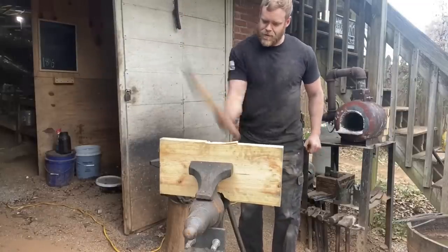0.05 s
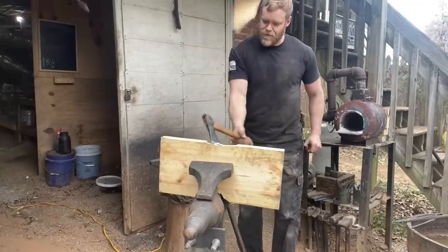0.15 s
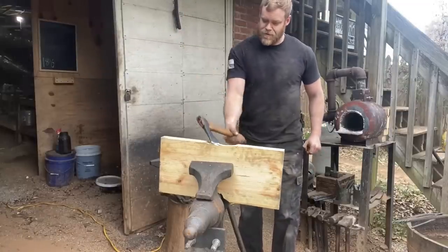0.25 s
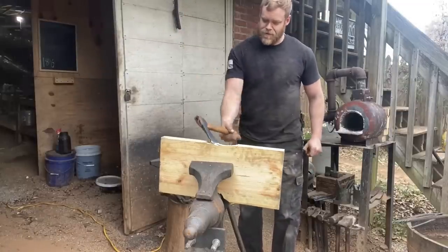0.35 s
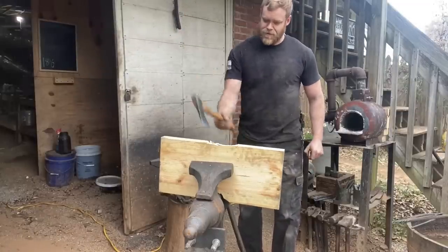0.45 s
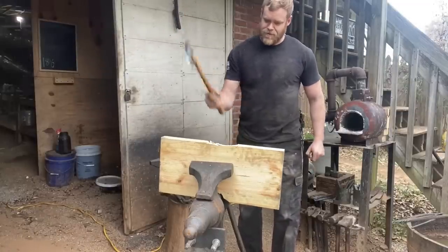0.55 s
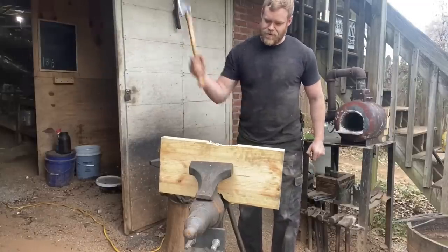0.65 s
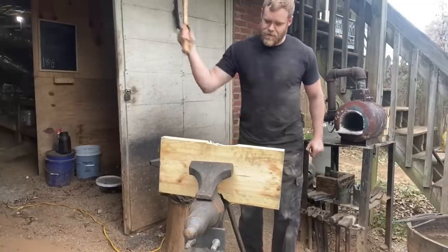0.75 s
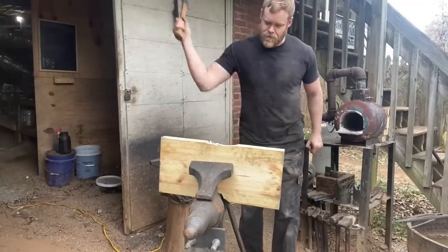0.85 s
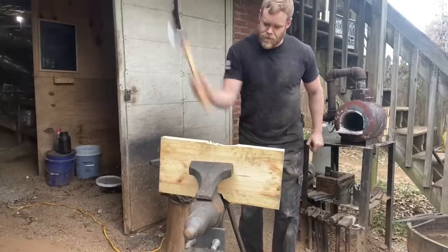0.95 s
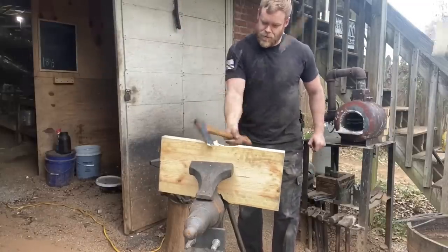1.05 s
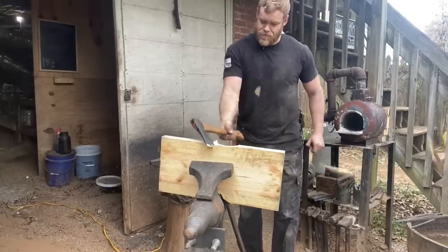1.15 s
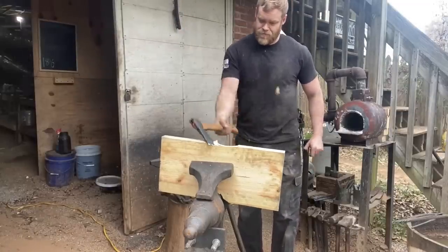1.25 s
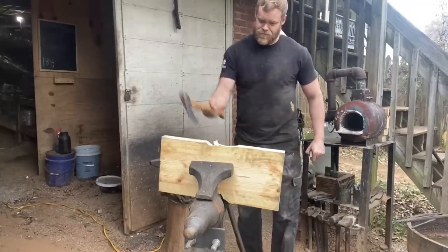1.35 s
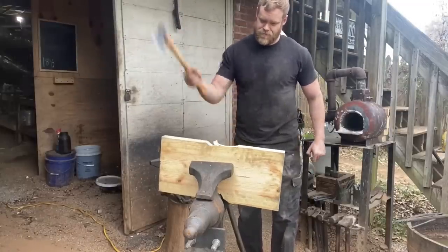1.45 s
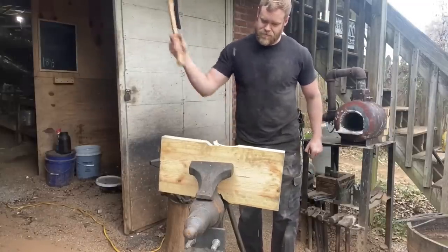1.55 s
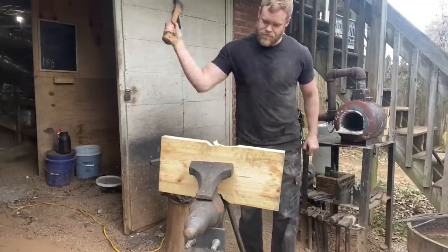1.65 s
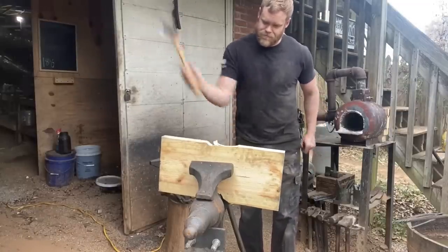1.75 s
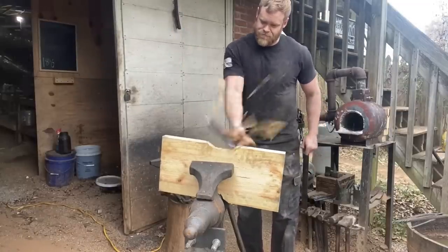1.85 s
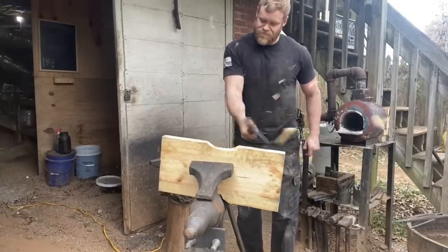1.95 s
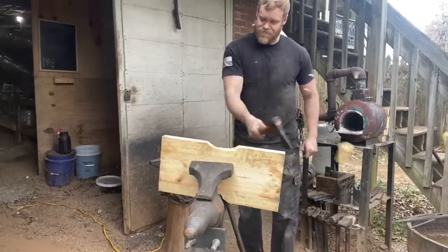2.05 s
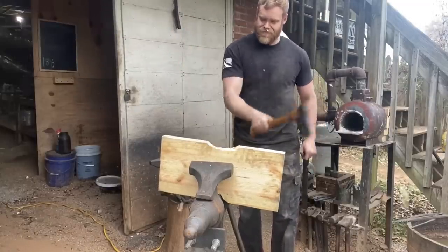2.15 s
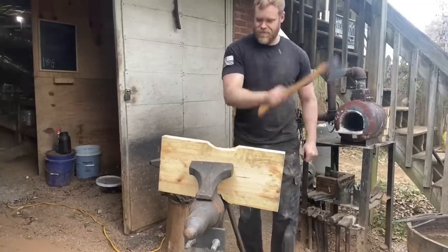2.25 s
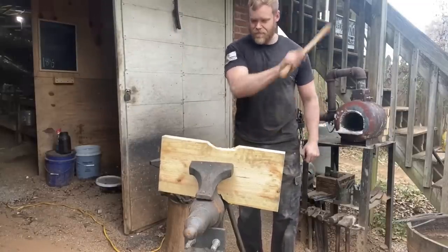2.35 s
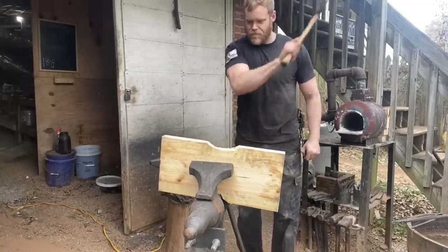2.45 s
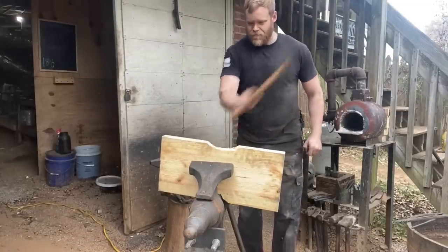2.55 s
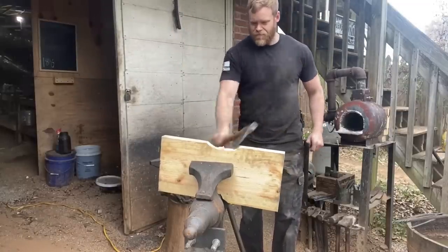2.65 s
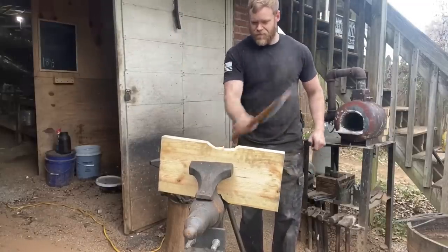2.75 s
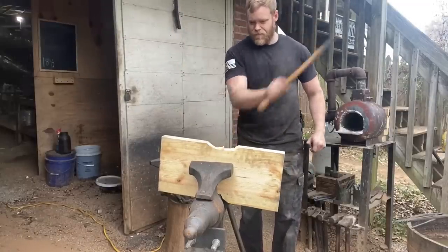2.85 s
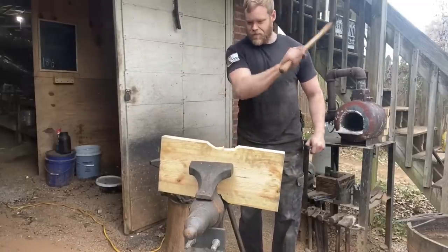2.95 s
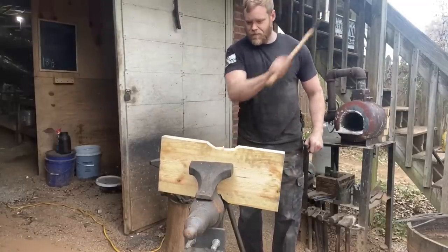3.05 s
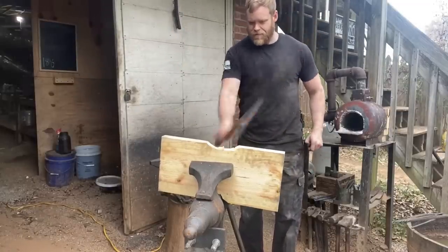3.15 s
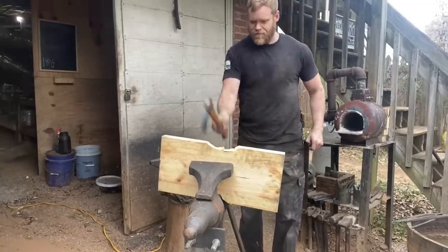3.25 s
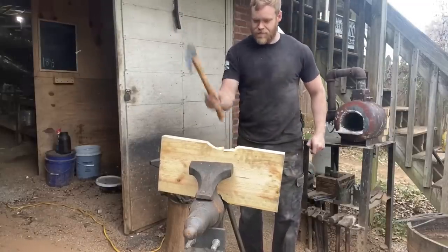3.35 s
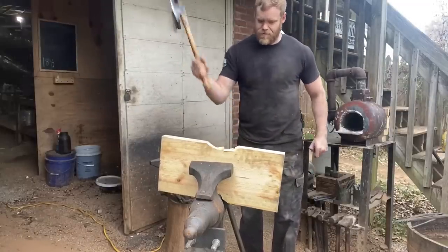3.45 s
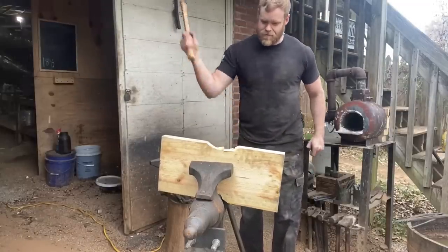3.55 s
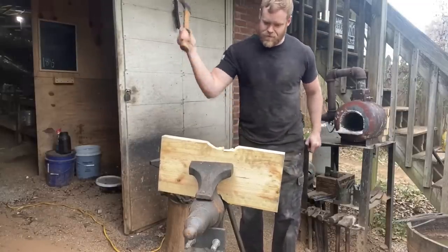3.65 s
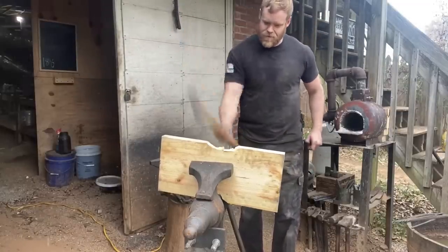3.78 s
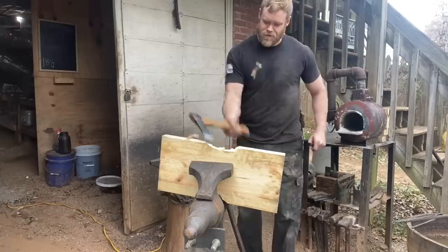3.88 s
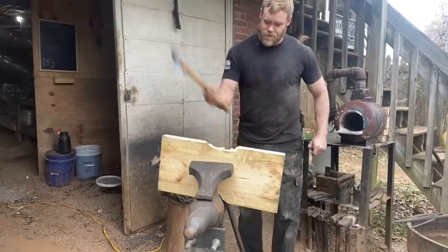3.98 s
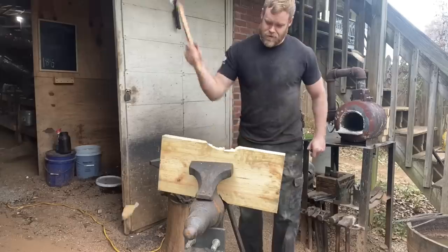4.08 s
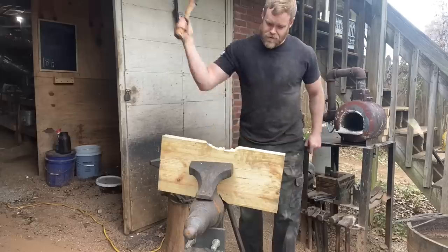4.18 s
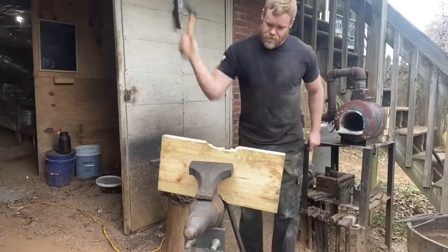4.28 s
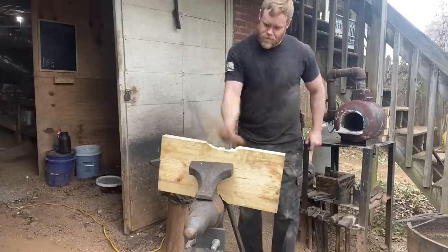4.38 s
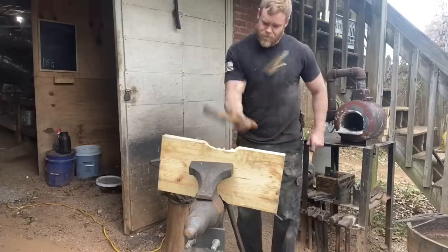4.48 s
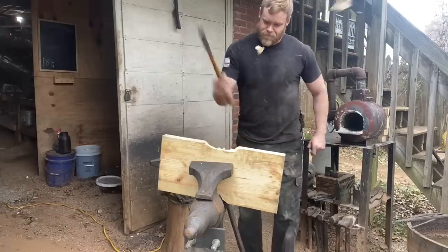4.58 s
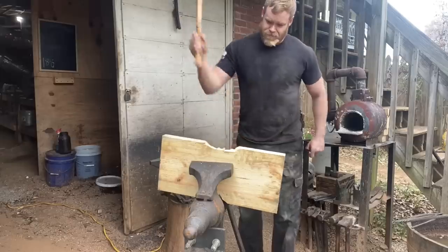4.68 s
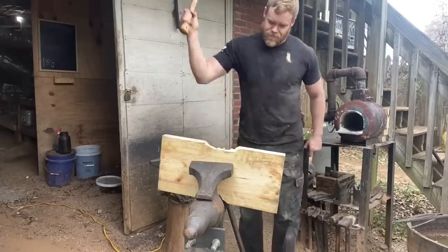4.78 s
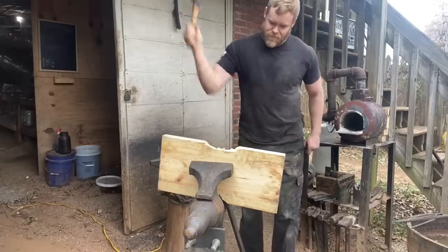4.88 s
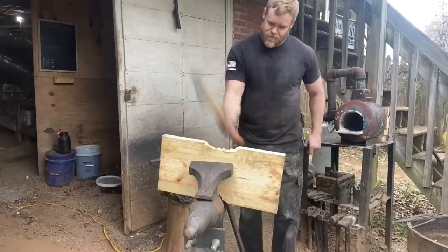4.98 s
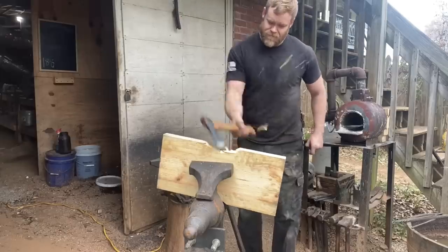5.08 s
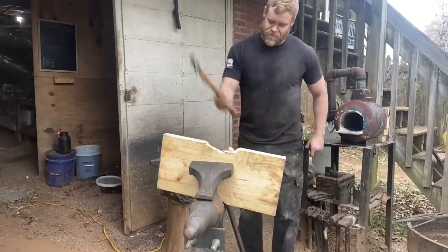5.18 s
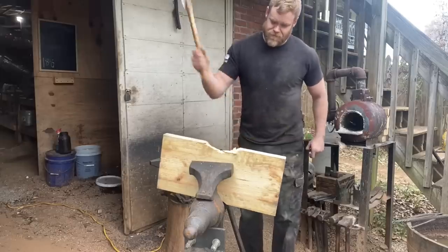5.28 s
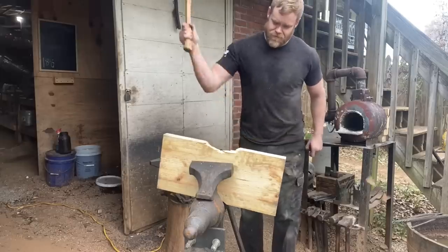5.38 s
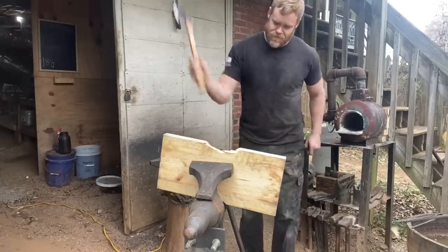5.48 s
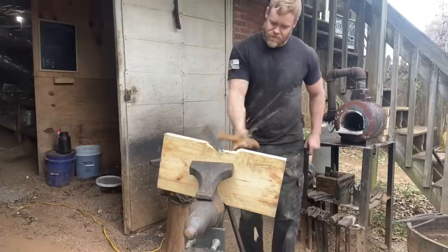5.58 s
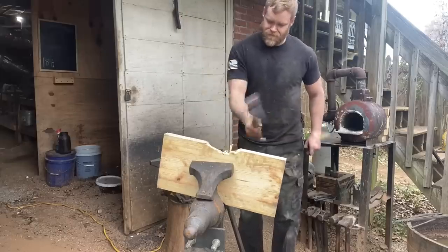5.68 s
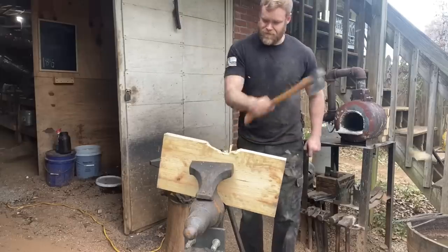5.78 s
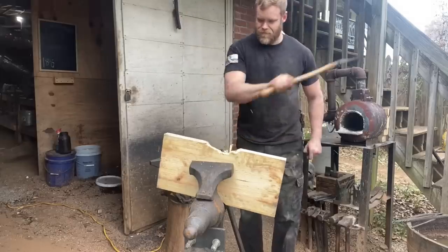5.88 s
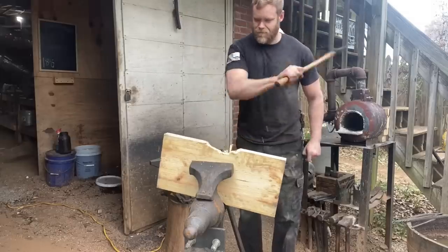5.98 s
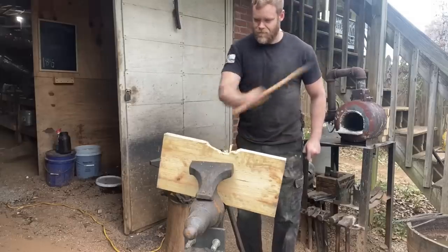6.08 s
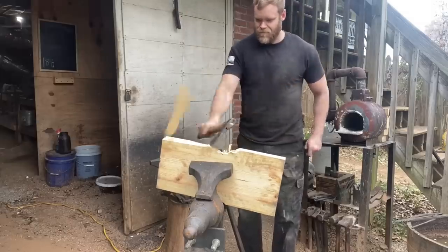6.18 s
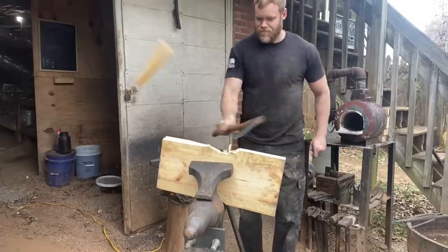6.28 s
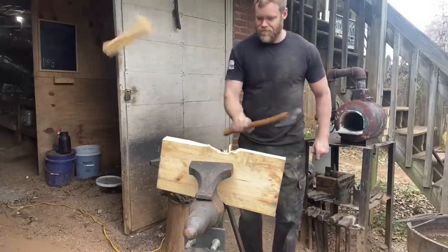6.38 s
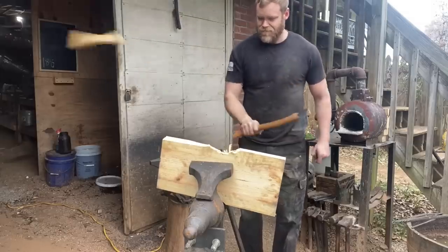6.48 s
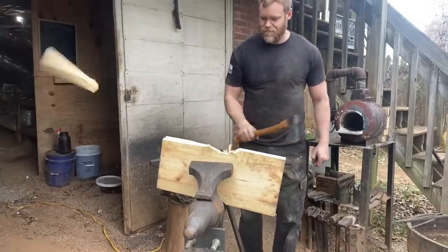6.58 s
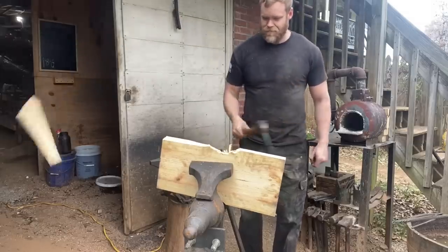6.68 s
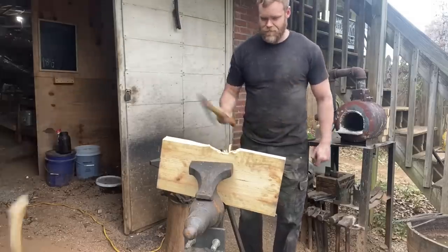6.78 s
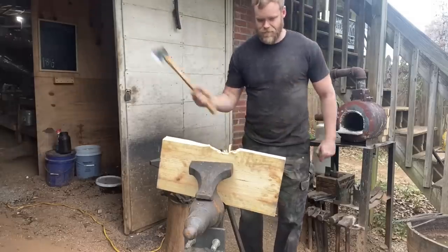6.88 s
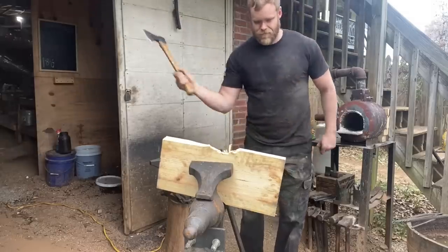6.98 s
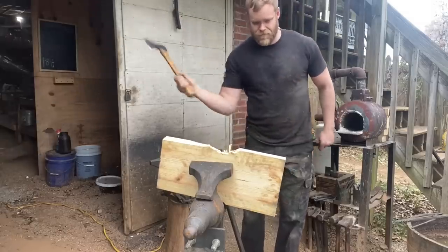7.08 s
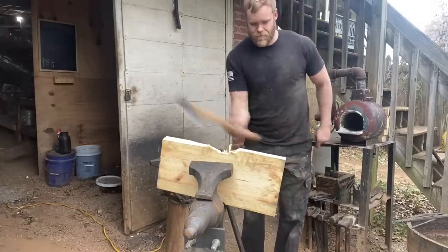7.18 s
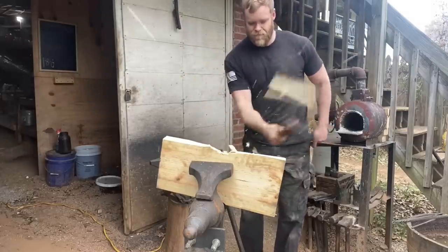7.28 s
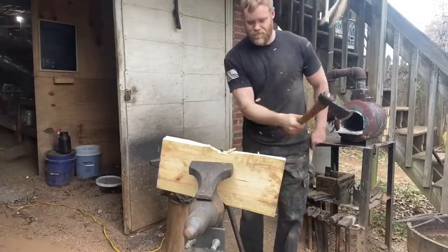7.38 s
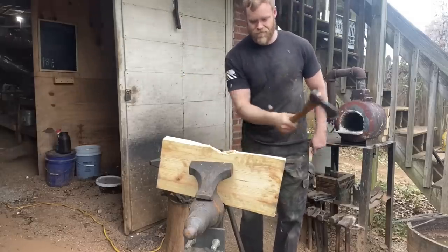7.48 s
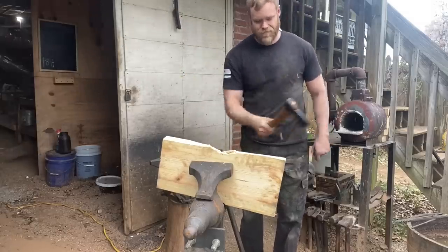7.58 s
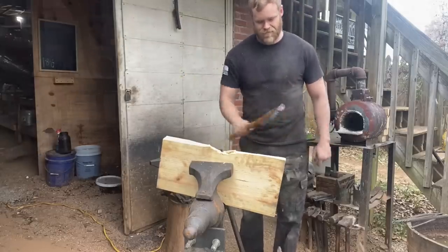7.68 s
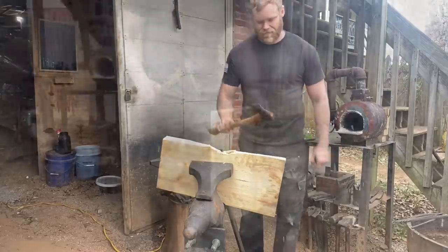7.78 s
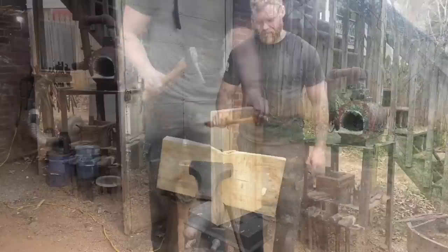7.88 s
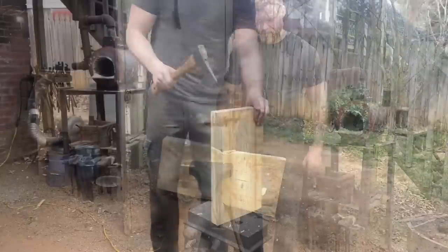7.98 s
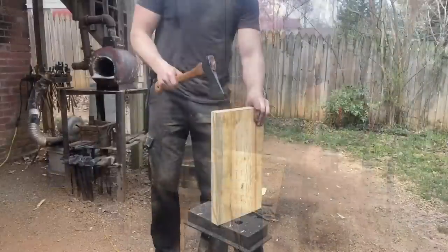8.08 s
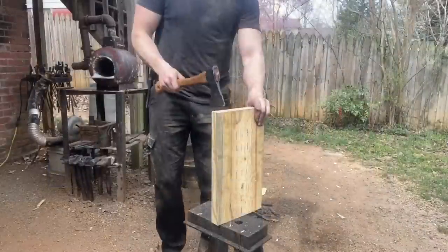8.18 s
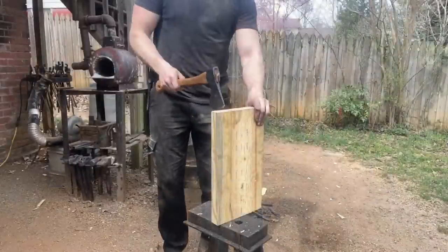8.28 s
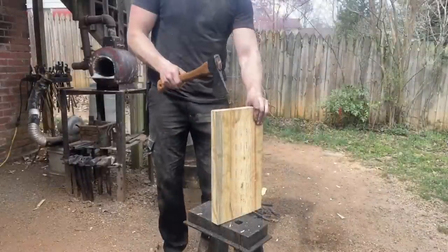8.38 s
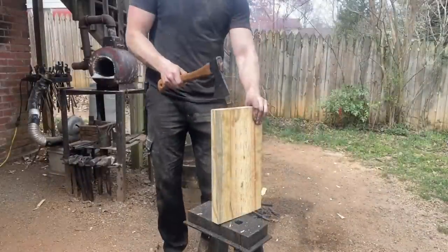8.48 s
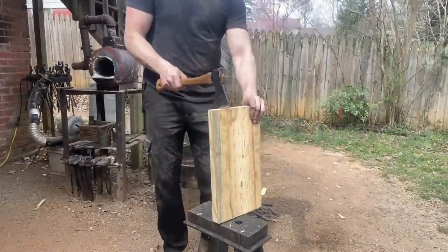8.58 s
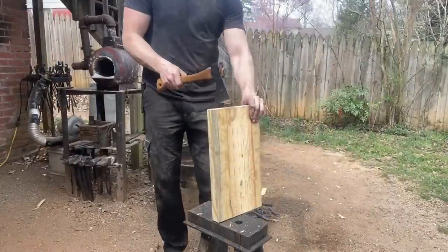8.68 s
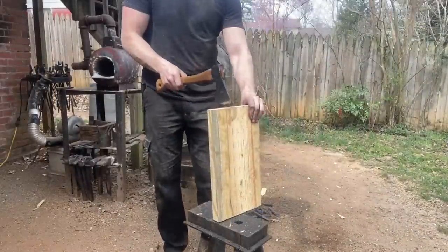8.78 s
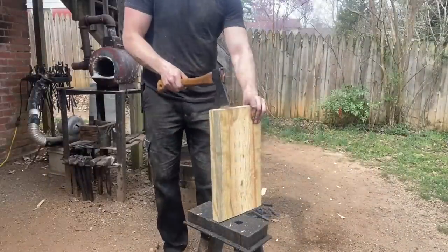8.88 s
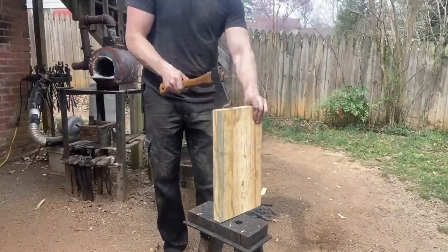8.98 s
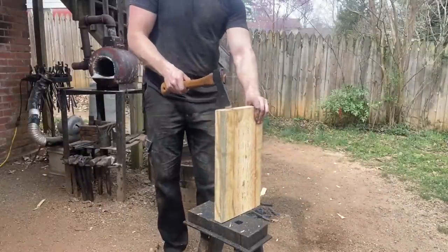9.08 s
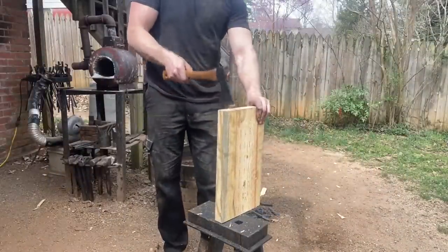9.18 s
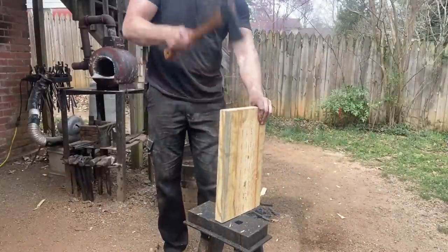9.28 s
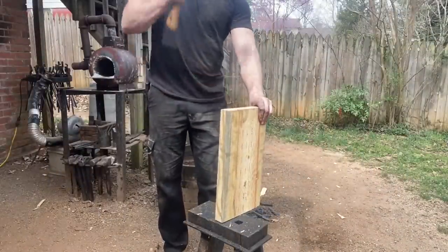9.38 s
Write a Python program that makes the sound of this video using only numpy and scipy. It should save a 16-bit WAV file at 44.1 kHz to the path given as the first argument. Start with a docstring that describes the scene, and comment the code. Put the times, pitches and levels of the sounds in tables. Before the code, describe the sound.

Eleven strong, dry axe chops on a board held in a vice, each with a short reflection off nearby walls and a faint yard tail. Small chips land as ticks, loose wood scrapes, and a wind gust thumps the microphone midway. After the last chop and a clatter, steady open-air noise rises with whistling small birds, soft scuffs and two light touches of the axe on upright wood.

```python
"""Outside a workshop, in still air and a swelling breeze (shaped noise), an axe chops eleven times into the
edge of a clamped pine board: noise for torn fibres, a sagging knock, and dying tones for wood and steel.
Chips land as short ticks; loose wood scrapes, knocks and at last clatters down; one gust thumps midway.
Then an open yard fades in as noise, with small birds made of whistled glides and a far chorus of noise.
There the axe is set lightly on an upright board, twice: a click and short woody tones."""
import sys
import numpy as np
from scipy import signal
from scipy.fft import rfft, irfft
from scipy.io import wavfile
from scipy.ndimage import uniform_filter1d, minimum_filter1d

SR = 44100
rng = np.random.default_rng(int(sys.argv[2]) if len(sys.argv) > 2 else 0)


def dump(signal):
    """Clip the signal to [-1, 1] and save it as 16-bit WAV at the path in sys.argv[1]."""
    limited = np.clip(np.atleast_2d(signal).T, -1, 1)
    pcm = np.round(limited * 32767).astype(np.int16)
    wavfile.write(sys.argv[1], SR, pcm)


N = 416304

# chops and their rebounds: start_s, bite_s (how long the edge sinks in), knock_hz, hold (times the ring time
# of the board), strength_db; then, added to strength: knock_db (hollow), thud_db (low), crack_db (fibres);
# then steel_db (level of the axe head's ring), carry_db (extra level sent to the far yard)
CHOPS = [(0.0896, 0.0029, 1058, 0.77, -24.5, 7.5, 5, 0, -41.5, 9),
         (1.0219, .0031, 1060, 1.15, -23.5, -0.5, -4, 1, -40.5, 3),
         (1.0731, .0015, 1150, 1.55, -28, -5.5, -9.5, -19, -62, 6.5),
         (1.8379, .008, 736, 1.09, -23, 1.5, -2, 0.5, -40.5, 4.5),
         (2.6169, .002, 1000, 1.38, -22.5, 3, 6, -1.5, -38, 2.5),
         (3.1754, 0.0041, 1325, 1.45, -31, 20.5, 7, 2.5, -55, 8.5),
         (3.8124, 0.005, 917, 0.93, -22, 0.5, 0.5, 2, -35.5, 3),
         (4.407, .0036, 1300, 1.2, -22.5, 1, -3, 0.5, -50, 0.5),
         (5.0229, 0.0041, 968, 0.82, -24.5, 10, -3, 1.5, -38.5, 4),
         (5.5867, 0.0017, 942, 1.13, -16.5, -3.5, -6.5, -5, -33, 0.5),
         (6.1663, 0.0017, 1119, 0.92, -21, 1.5, 3, -2.5, -32, 1.5),
         (7.1915, .008, 950, 0.92, -24, 3, 0, 4, -48.5, -1),
         (7.2216, 0.0061, 973, 1.17, -30, 12, 2.5, 6.5, -55.5, -1.5)]
# edges of the bands in which a chop gets its colour: edge_hz
CHOP_BANDS = [100, 320, 620, 950, 1250, 2200, 3300, 5500, 9000, 15000]
# edges of the bands in which a knock of loose wood gets its colour: edge_hz
KNOCK_BANDS = [150, 400, 900, 2200, 5500, 15000]


def amp(db):
    """Turns decibels into a gain."""
    return 10 ** (np.asarray(db) / 20)


def evened(x):
    """Scales a sound to rms 1."""
    return x / np.sqrt(np.mean(x ** 2) + 1e-20)


def read(points, hz, axis=1):
    """Reads a column of a table at any pitch, in straight lines over log frequency."""
    table = np.array(points)
    return np.interp(np.log(hz + 1), np.log(table[:, 0] + 1), table[:, axis])


def add(mix, s, sound):
    """Mixes a sound in at second s."""
    part = mix[round(s * SR):][:len(sound)]
    part += sound[:len(part)]


def clock(size=20000):
    """The time axis of one short sound, in seconds."""
    return np.arange(size) / SR


def band(x, hz, kind, order=2):
    """A low-, high- or band-pass filter."""
    edge_hz = np.minimum(hz, SR / 2 - 100)
    return signal.sosfilt(signal.butter(order, edge_hz, kind, fs=SR, output="sos"), x)


def noise(tone, same):
    """Steady noise of a given spectrum; same = 1 makes both channels alike, 0 unrelated."""
    gain = amp(read(tone, np.fft.rfftfreq(N, 1 / SR)))
    a, b = irfft(rfft(rng.standard_normal((2, N))) * gain, N)
    return evened(np.array([a, same * a + np.sqrt(1 - same ** 2) * b]))


def waver(hz):
    """A slow random curve of rms 1 that moves no faster than hz."""
    return evened(irfft(rfft(rng.standard_normal(N)) * (np.fft.rfftfreq(N, 1 / SR) < hz), N))


def ring(modes, spread_db, hold=1, drift=0.0):
    """Struck solids ring in dying tones; each blow shares its force anew and shifts the pitches a little."""
    t = clock()
    total = np.zeros(len(t))
    for hz, db, t60 in modes:
        level = amp(db + spread_db * rng.standard_normal() - 60 * t / (t60 * hold))
        # low tones shift less than those from 1500 Hz up
        shift = 1 + drift * min(hz / 1500, 1) * rng.standard_normal()
        total += level * np.sin(2 * np.pi * (hz * shift * t + rng.random()))
    return total


def grit(grain_db):
    """Noise made of snaps of uneven size."""
    size = len(clock())
    unevenness = evened(uniform_filter1d(rng.standard_normal(size), size=14))
    return evened(rng.standard_normal(size) * amp(grain_db * unevenness))


def centres(edges):
    """The middle of each band, in Hz."""
    return np.sqrt(np.multiply(edges[1:], edges[:-1]))


def hump(hz, centre_hz, octaves):
    """A bell on the octave scale, 1 at its centre."""
    return np.exp(-(np.log2(hz / centre_hz) / octaves) ** 2)


def voiced(x, edges, levels_db, size=32768, count=1764):
    """Filters a blow so that its first 40 ms approach the wanted level in each band."""
    hz = np.fft.rfftfreq(size, 1 / SR)
    for _ in range(2):
        power = 2 * abs(rfft(x[:count], size)) ** 2 / size / count
        in_band = [power[(hz >= a) & (hz < b)].sum() + 1e-20 for a, b in zip(edges, edges[1:])]
        missing_db = levels_db - 10 * np.log10(in_band)
        log_gain = np.log(amp(read(np.c_[centres(edges), missing_db], hz)))
        # minimum phase: the filter adds nothing ahead of the blow
        mirrored = np.r_[log_gain, log_gain[-2:0:-1]]
        causal = np.exp(np.conj(signal.hilbert(mirrored)))[:len(hz)]
        x = irfft(rfft(x, size) * causal)[:len(x)]
    return x


def breeze_db(t):
    """The wind's level over time: smooth swells over a calm."""
    # swells: crest_s, half_width_s, level_db (before the trim below)
    swells = [(.3, .35, -53), (1.12, .3, -45), (2.15, .35, -51), (4.0, .45, -48), (4.98, .11, -34),
              (5.4, 0.63, -54), (7.25, .22, -50), (9.001, 0.94, -44.5)]
    power = amp(-59) ** 2  # the calm, before the trim
    for s, width, db in swells:
        power = power + amp(db) ** 2 * np.exp(-((t - s) / width) ** 2)
    return 20 * np.log10(np.sqrt(power)) - 1.5


def wind():
    """Wind on the microphone: deep noise, much alike in both channels, with a lumpy level."""
    # spectrum of the wind: pitch_hz, relative level_db (per Hz)
    wind_tone = [(15, -38.5), (25, -9), (54, 5), (118, -4), (183, -16.5), (292, -25.5), (322, -29),
                 (500, -28), (650, -60), (1100, -120)]
    rumble = evened(band(noise(wind_tone, same=0.72), 48, "high", order=3))
    lumps_db = 1.5 * waver(hz=39) + 2.4 * waver(hz=6.5)
    return rumble * amp(breeze_db(np.arange(N) / SR) + lumps_db)


def still_air():
    """Still air by the workshop: soft noise whose level hardly moves."""
    # spectrum of the air: pitch_hz, relative level_db (per Hz)
    air_tone = [(60, -11), (120, 0), (200, -10), (450, -12), (900, -17), (1400, -23), (2100, -24.5),
                (2900, -29), (4200, -34.5), (6000, -40.5), (9500, -35.5), (15000, -53)]
    return noise(air_tone, same=0.19) * amp(-59.5 + 1.0 * waver(hz=1.6))


def chop_colour(knock_hz, strength_db, knock_db, thud_db, crack_db):
    """Where and how deep the edge lands shares the blow between thud, hollow knock and crack."""
    # the colour that all chops share: pitch_hz, level_db (of the band there, added to strength)
    chop_tone = [(180, -9), (445, 0), (770, -1.5), (1090, -3), (1660, -2.5), (2700, -8), (4260, -6.5),
                 (7040, -8), (11600, -6)]
    hz = centres(CHOP_BANDS)
    knock_part = knock_db * hump(hz, knock_hz, octaves=0.39)
    thud_part = thud_db * (hz < 320)
    crack_part = crack_db * (hz > 2200)
    return strength_db + read(chop_tone, hz) + knock_part + thud_part + crack_part


def chop(bite, knock_hz, hold, levels_db):
    """The edge tears fibres while it sinks in; as it stops, the board takes the blow and rings."""
    # tones of the clamped board: pitch_hz, relative level_db, t60_s (time to fall 60 dB, before hold)
    board_modes = [(150, -12, .09), (219, -10, .15), (242, -14, .22), (375, -17, .07), (404, -9, .12),
                   (505, 0, .15), (783, -2, .085), (890, -11, .05), (1020, -6, .07), (1086, 0, .06),
                   (1160, -10, .045), (1340, -5, .05), (1395, 1, .055), (1660, -7, .06), (1935, -13, .05),
                   (2085, -13, .05), (2267, -11, .06), (2633, -13, .06), (2850, -15, .06), (3574, -13, .06)]
    t = clock()
    after = np.maximum(t - bite, 0)
    fade = np.exp(-after / 0.0012) + 0.27 * np.exp(-after / 0.018)
    tearing = (1 - np.exp(-t / 0.0001)) * np.exp(-0.45 * np.minimum(t / bite, 1)) * fade
    fibres = band(band(grit(grain_db=3.5), 930, "high"), 18000, "low", order=4)
    crack = 1.3 * fibres * tearing
    # the push on the board grows until the edge has nearly stopped
    load = np.minimum(t / (0.92 * bite), 1) ** 2
    # the wood under the edge gives a few strong cycles whose pitch sags
    turns = knock_hz * (t + 0.0006 * (1 - np.exp(-t / 0.004)))
    thock = 2.1 * np.sin(2 * np.pi * turns) * np.exp(-(after / 0.0047) ** 2)
    rattle = evened(band(rng.standard_normal(len(t)), [220, 1800], "band"))
    shake = 2.0 * rattle * np.exp(-after / 0.0051)
    board = ring(board_modes, spread_db=2.5, hold=hold, drift=0.004)
    wood = band(load * (thock + shake + board), 49, "high")
    # the vice and its stand take a dull push
    push = amp(-40.5) * np.sin(2 * np.pi * 95 * t) * np.exp(-t / 0.0061)
    return voiced(crack + wood, CHOP_BANDS, levels_db) + push


def axe_head(db):
    """The steel head rings in high, clear tones."""
    # tones of the axe head: pitch_hz, relative level_db, t60_s (time to fall 60 dB)
    steel_modes = [(4912, -8, .12), (5007, 4, .19), (6403, -10, .14), (6542, 1, .18), (6590, -2, .12),
                   (8030, -1, .12), (8228, 4, .13)]
    return amp(db) * ring(steel_modes, spread_db=2)


def chip(db):
    """A chip lands: a dry tick with a pitch of its own, peaking at db."""
    snap = band(grit(grain_db=7.5), [2200, 12500], "band") * np.exp(-clock() / 0.006)
    pitch_hz = rng.uniform(3000, 14000)
    tick = snap + 1.5 * band(snap, [pitch_hz, 1.2 * pitch_hz], "band", order=1)
    return amp(db) * tick / abs(tick).max()


def crumbs(db, per_s, fall_s):
    """After each chop, crumbs of wood patter down, ever fewer, in eight kinds of tick."""
    t = np.arange(N) / SR
    rate = np.zeros(N)
    for row in CHOPS:
        # the first crumbs land 80 ms after the chop, when the rate has already begun to fall from per_s
        rate += per_s * (t > row[0] + 0.08) * np.exp(-abs(t - row[0]) / fall_s)
    sizes = amp(5.6 * np.minimum(rng.exponential(1, N), 3))
    hits = (rng.random(N) < rate / SR) * sizes
    kind = rng.integers(0, 8, N)
    return sum(signal.oaconvolve(hits * (kind == k), chip(db))[:N] for k in range(8))


def splinters(db, spread_db, count=2):
    """Each chop throws a few splinters that land after a short flight; the later, the fainter."""
    out = np.zeros(N)
    for row, draws in zip(CHOPS, rng.random((len(CHOPS), count))):
        for flight in draws:
            flight_s = np.interp(flight, [0, 1], [0.14, 0.42])
            add(out, row[0] + flight_s, chip(db - spread_db * flight))
    return out


def large_chips():
    """The larger chips land one by one."""
    # landings: start_s, peak_db (before a 1 dB lift)
    landings = [(1.6255, -38), (1.711, -38), (1.8022, -36.5), (2.152, -44.5), (2.975, -38), (3.0524, -45.5),
                (3.116, -36), (3.996, -37), (4.595, -43), (5.294, -35.5), (5.324, -40), (5.8495, -40.5),
                (6.9377, -45), (7.167, -33.5)]
    out = np.zeros(N)
    for s, db in landings:
        add(out, s, chip(db + 1.0))
    return out


def knock_colour(strength_db, tilt_db, body_db):
    """The tilt sets how bright a knock is (dB per octave); the body adds a hollow, woody middle."""
    hz = centres(KNOCK_BANDS)
    return strength_db + tilt_db * np.log2(hz / 1400) + body_db * hump(hz, 1000, octaves=0.66)


def knock(contact, levels_db):
    """A loose piece meets gritty ground and rings briefly; short contacts snap, long ones swell into a scuff."""
    # tones of a loose piece of wood: pitch_hz, relative level_db, t60_s (time to fall 60 dB)
    offcut_modes = [(366, -5.5, 0.03), (425.5, -5.5, 0.072), (601, -3, 0.037), (950, -2.5, 0.015),
                    (1107, -5, 0.023), (1475, -9, 0.017), (2430, 0, 0.036), (4370, -14.5, .09),
                    (5360, -7, .07)]
    t = clock()
    swell_s = contact ** 2 / 0.04
    touch = (1 - np.exp(-t / swell_s)) * np.exp(-t / contact)
    scrape = band(band(grit(grain_db=8.5), 170, "high"), 12000, "low", order=4) * touch
    body = 0.26 * ring(offcut_modes, spread_db=3.5, drift=0.0039) * (1 - np.exp(-t / (0.5 * contact)))
    return voiced(scrape + body, KNOCK_BANDS, levels_db)


def loose_wood():
    """Loose pieces land, slide and scuff."""
    # contacts: start_s, contact_s, strength_db, tilt_db (brightness per octave), body_db (woody middle)
    contacts = [(.272, 0.021, -56.5, 2, -6), (1.39, 0.0055, -57, 3, -1), (2.418, 0.0094, -57.5, 1.8, 5),
                (2.485, 0.0032, -53, 2.5, -27), (3.386, 0.014, -62, -5, 19.5),
                (6.856, 0.0062, -49.5, -2.5, 8.5), (7.007, 0.011, -45.5, 1.5, -15),
                (7.016, 0.0026, -40, 0.1, 20), (8.172, 0.028, -48.5, -1.6, -4),
                (8.205, 0.017, -51, -1, 13.5), (8.81, 0.016, -49.5, -4, 5), (8.846, .014, -47, -4, 13)]
    out = np.zeros(N)
    for s, contact, *colour in contacts:
        add(out, s, knock(contact, knock_colour(*colour)))
    return out


def gust(length, db):
    """An eddy hits the microphone with a soft, low thump."""
    size = round(length * SR)
    thump = band(rng.standard_normal(SR), [65, 210], "band")[-size:]
    return amp(db) * evened(thump * np.hanning(size))


def gusts():
    """Eddies buffet the microphone, alike in both channels."""
    # eddies: start_s, length_s, level_db
    eddies = [(4.807, 0.043, -47.5), (4.872, 0.043, -63), (4.967, 0.07, -37)]
    out = np.zeros(N)
    for s, length, db in eddies:
        add(out, s, gust(length, db))
    return out


def open_yard():
    """The open yard fades in as wide, steady noise."""
    # spectrum of the yard: pitch_hz, relative level_db (per Hz)
    yard_tone = [(59, -30.5), (100, 5.5), (204, -13.5), (236, -5.5), (262, -19), (297, -14.5), (1660, -26),
                 (3110, -30.5), (3390, -33.5), (4450, -33), (5260, -42.5), (12200, -55), (15000, -66.5)]
    # its fade over time: time_s, level_db
    yard_fade = [(0, -100), (7.5, -84.5), (7.85, -56), (8.25, -46), (8.8, -45), (9.44, -47)]
    level_db = np.interp(np.arange(N) / SR, *np.transpose(yard_fade))
    return noise(yard_tone, same=0.1) * amp(level_db + 1.0 * waver(hz=9))


def bird(length, start_hz, end_hz, db):
    """One whistled glide, slightly arched and unsteady."""
    u = np.linspace(0, 1, round(length * SR))
    wobble = evened(uniform_filter1d(rng.standard_normal(len(u)), size=120))
    hz = start_hz + (end_hz - start_hz) * u + 70 * np.sin(np.pi * u) + 35 * wobble
    return amp(db) * np.sqrt(2) * np.sin(np.pi * u) * np.sin(2 * np.pi * np.cumsum(hz) / SR)


def birdsong(count=4):
    """One bird rolls its phrase over and over while others whistle falling notes."""
    # notes of the rolling phrase: offset_s (into the phrase), length_s, start_hz, end_hz,
    # level_db (before the fade-in and the mix)
    phrase = [(0, 0.046, 2174, 3025, -54.5), (0.071, 0.024, 3060, 3180, -53), (0.164, .05, 3550, 3920, -58),
              (.208, 0.032, 2870, 2286, -57)]
    # falling notes of other birds: start_s, length_s, start_hz, end_hz, level_db (before the mix)
    whistles = [(8.286, 0.068, 6250, 6030, -65), (8.42, 0.17, 3920, 3840, -68),
                (8.854, .11, 4950, 4450, -59), (9.046, 0.11, 4860, 4290, -57),
                (9.295, 0.05, 4600, 4400, -49.5)]
    first_s, every_s = 8.284, 0.306
    full_s, fade_db_per_s = 8.56, 52  # the rolling song fades in with the yard
    song = np.zeros(N)
    for start in first_s + every_s * np.arange(count):
        for offset, *note in phrase:
            s = start + offset
            add(song, s, amp(-fade_db_per_s * max(full_s - s, 0)) * bird(*note))
    for s, *note in whistles:
        add(song, s, bird(*note))
    return song


def chorus():
    """Small birds singing together far off blur into a flickering band of noise."""
    # spectrum of the chorus: pitch_hz, relative level_db (per Hz)
    chorus_tone = [(1500, -44), (2300, -11.5), (3200, -7), (4000, -4.5), (4700, -1.5), (5100, -14),
                   (6000, -45.5)]
    # its fade over time: time_s, level_db (around which it flickers)
    chorus_fade = [(0, -130), (7.9, -92.5), (8.45, -94), (8.7, -66), (8.9, -67), (9.44, -62)]
    level_db = np.interp(np.arange(N) / SR, *np.transpose(chorus_fade))
    return noise(chorus_tone, same=0.21) * amp(level_db + 4.7 * waver(hz=25))


def tap(db):
    """The axe's edge touches the upright board: a tiny click and short woody tones."""
    # tones it rings with: pitch_hz, relative level_db, t60_s (time to fall 60 dB)
    upright_modes = [(109.2, 4, .12), (246, 6.5, 0.057), (520, 4.5, 0.022), (695, 5.5, 0.018),
                     (908, 11, 0.021), (1315, 2.5, 0.027), (2004, 1, 0.035), (2600, -10, 0.027),
                     (2900, -4, 0.033), (4850, -30, .08), (8200, -10.5, 0.022)]
    t = clock()
    click = 0.74 * band(rng.standard_normal(len(t)), 7900, "low") * np.exp(-t / 0.001)
    onset = 1 - np.exp(-t / 0.00084)
    return amp(db) * (2.0 * ring(upright_modes, spread_db=1.5) + click) * onset


def axe_set_down():
    """The axe is set lightly on the upright board."""
    # touches: start_s, level_db (scales the click and the tones)
    touches = [(8.602, -40), (9.0375, -39.5)]
    out = np.zeros(N)
    for s, db in touches:
        add(out, s, tap(db))
    return out


def scatter(x, bands, delay, same):
    """Sparse reflections of random sign, each band dying at its own speed."""
    taps = rng.choice([-1., 1.], (2, SR)) * (rng.random((2, SR)) < 4000 / SR)
    taps[1] = same * taps[0] + np.sqrt(1 - same ** 2) * taps[1]
    hz, t, z = signal.stft(evened(taps), SR, nperseg=256)
    t60 = read(bands, hz, axis=2)[:, None]
    # the root keeps a band's total energy the same however long it lasts
    gain = amp(read(bands, hz)[:, None] - 60 * t / t60) * np.sqrt(2 * np.log(1000) / t60 / SR)
    tail = signal.istft(z * gain, SR, nperseg=256)[1]
    tail = np.pad(tail, ((0, 0), (round(delay * SR), 0)))
    return signal.fftconvolve(x[None], tail, axes=1)[:, :N]


def vice_scatter(x):
    """The vice, anvil and ground right at the board scatter the higher part of a blow."""
    # reflections: pitch_hz, level_db, t60_s (time to fall 60 dB)
    close_bands = [(1300, -14, 0.026), (2300, -5, 0.041), (5800, -6.5, 0.03), (8000, -16.5, 0.004),
                   (14000, -12.5, 0.019)]
    return scatter(band(x, 1800, "high"), close_bands, delay=0.0003, same=0.033)


def wall_scatter(x, delay, same):
    """The walls close by send back a short tail."""
    # reflections: pitch_hz, level_db (before the mix), t60_s (time to fall 60 dB)
    near_bands = [(150, -10.5, 0.32), (500, -9.5, 0.12), (1100, -8.5, 0.09), (3000, -10.5, 0.14),
                  (8500, -13, 0.22), (14000, -20.5, 0.11)]
    return scatter(x, near_bands, delay, same)


def yard_scatter(x, delay, same):
    """The far yard sends back a tail that lingers in a few bands."""
    # reflections: pitch_hz, level_db (before the mix), t60_s (time to fall 60 dB)
    far_bands = [(150, -30.5, 0.64), (595, -27.5, 0.24), (1150, -35.5, 2.7), (1670, -30.5, 2.2),
                 (2280, -27.5, 0.33), (2720, -23, 1.8), (4400, -27.5, 0.69), (8000, -29, 0.26),
                 (12000, -35.5, 0.67), (15000, -48, .3)]
    return scatter(x, far_bands, delay, same)


def ports(x):
    """Direct sound reaches the two microphone ports a little apart, so phase and level differ."""
    # the two ports compared: pitch_hz, left_lead_rad, left_over_right_db
    port_gaps = [(200, -.2, 2), (480, -.22, 2.2), (820, -.65, .6), (1100, -.42, -.6), (1700, -.4, -.5),
                 (2700, -1, -.8), (4500, -1, -1.3), (5200, -1.6, -1.5), (6100, -1.5, -1), (6600, -.2, -1),
                 (9400, .15, -.6), (13400, 2.4, 0), (15000, 3, 0)]
    hz = np.fft.rfftfreq(N, 1 / SR)
    # each channel takes half of the gap, in opposite directions
    half = amp(read(port_gaps, hz, axis=2) / 2) * np.exp(0.5j * read(port_gaps, hz))
    return irfft(rfft(x) * np.array([half, 1 / half]), N)


def scene():
    """Chops, falling wood and birds, with their reflections from the walls and the yard, in the open air."""
    blows = np.zeros((4, N))
    carried, behind, steel = np.zeros((3, N))
    for k, (s, bite, knock_hz, hold, *shares_db, steel_db, carry_db) in enumerate(CHOPS):
        colour = chop_colour(knock_hz, *shares_db)
        blow = chop(bite, knock_hz, hold, colour)
        add(blows[k % len(blows)], s, blow)
        # the board radiates another mix of the same blow away into the yard
        away = chop(bite, knock_hz, hold, colour)
        add(carried, s, amp(carry_db) * np.sqrt(0.5) * blow)
        add(behind, s, amp(carry_db) * np.sqrt(0.5) * away)
        add(steel, s + bite / 2, axe_head(steel_db))
    loose = loose_wood() + large_chips() + axe_set_down()
    loose += crumbs(db=-60.5, per_s=200, fall_s=0.15) + splinters(db=-47, spread_db=11.5)

    # the moving body and axe change the near reflections from blow to blow: four sets take turns
    near = sum(vice_scatter(x) + wall_scatter(x, delay=0.0044, same=1.0) for x in blows)
    near += amp(1.5) * wall_scatter(loose, delay=0.0048, same=0.98)
    far = yard_scatter(carried + loose, delay=0.018, same=0.13)
    far += yard_scatter(behind, delay=0.04, same=0.15)

    song = birdsong()
    birds = amp(0.5) * song
    birds = birds + amp(6.5) * wall_scatter(song, delay=0.013, same=0.14)
    birds += amp(16.5) * yard_scatter(song, delay=0.0096, same=0.14)

    direct = ports(blows.sum(0) + steel + loose)
    outdoors = wind() + still_air() + open_yard() + chorus()
    return direct + near + far + birds + gusts() + outdoors


def record(dry):
    """The treble rolls off, a fast limiter holds the peaks, and a steep filter ends the band."""
    soft = band(dry, 13400, "low", order=5)
    ceiling = 0.92
    need = np.minimum(1, ceiling / (abs(soft).max(0) + 1e-9))
    held = soft * uniform_filter1d(minimum_filter1d(need, size=31), size=31)
    steep = signal.firwin(255, 16300, window=("kaiser", 9), fs=SR)
    return signal.oaconvolve(held, steep[None], "same")


dry = scene()
out = record(dry)
dump(out)
```